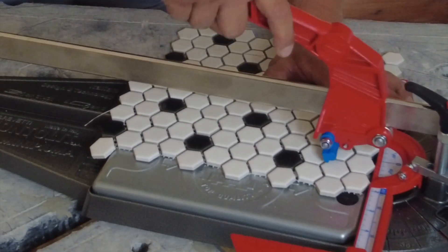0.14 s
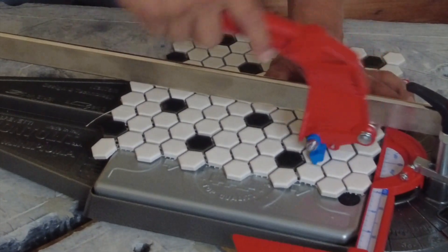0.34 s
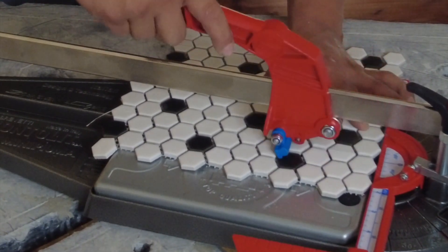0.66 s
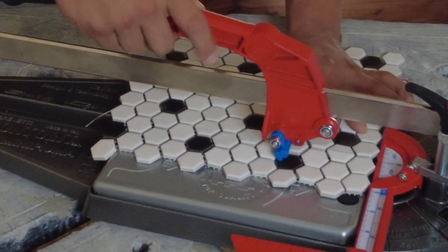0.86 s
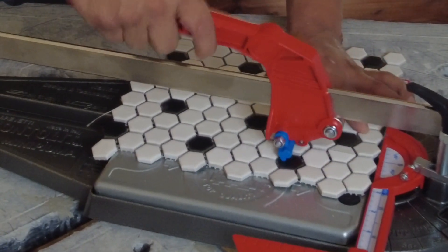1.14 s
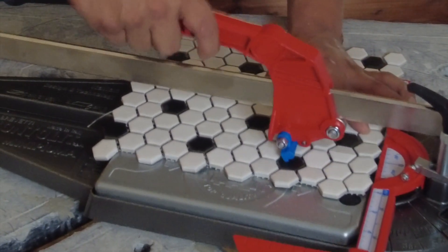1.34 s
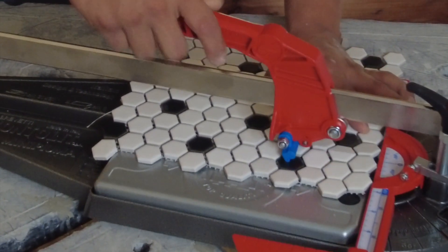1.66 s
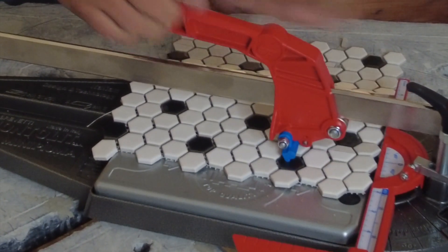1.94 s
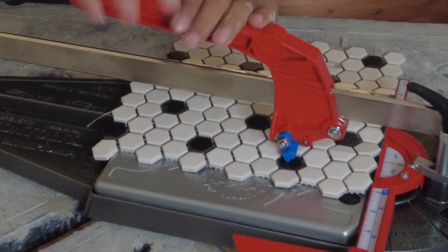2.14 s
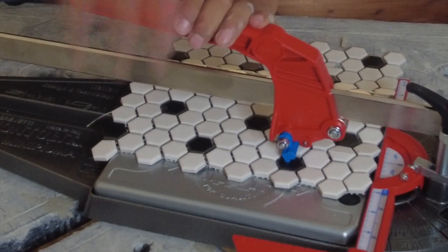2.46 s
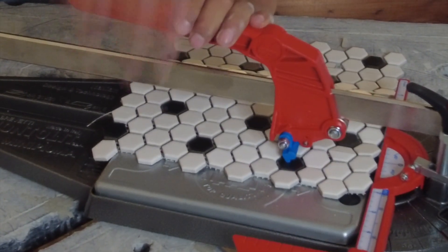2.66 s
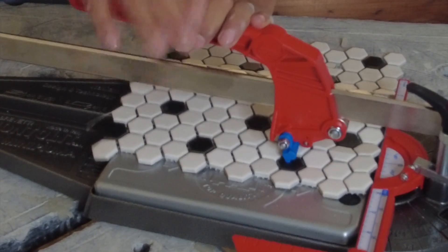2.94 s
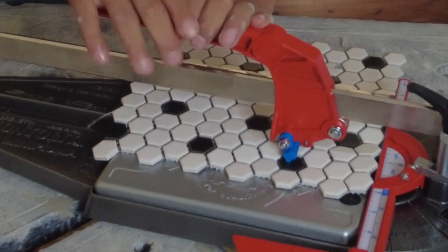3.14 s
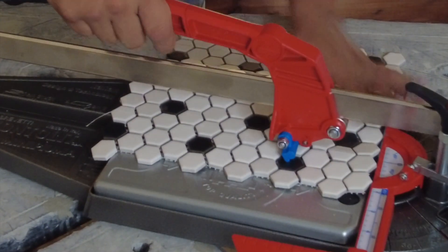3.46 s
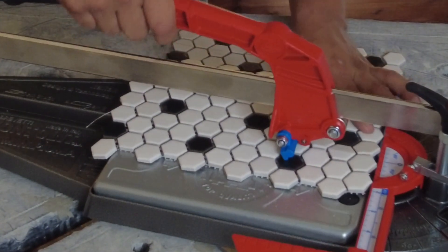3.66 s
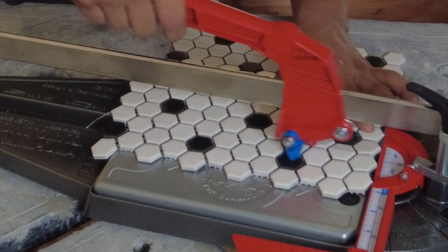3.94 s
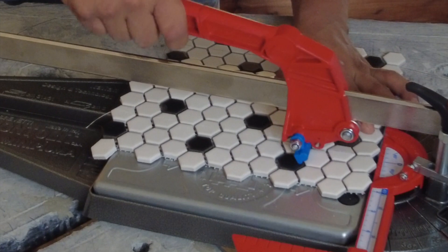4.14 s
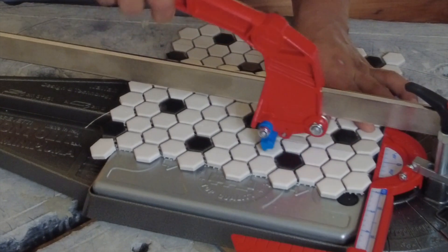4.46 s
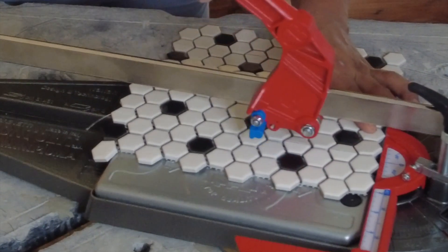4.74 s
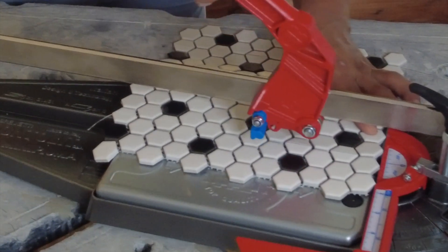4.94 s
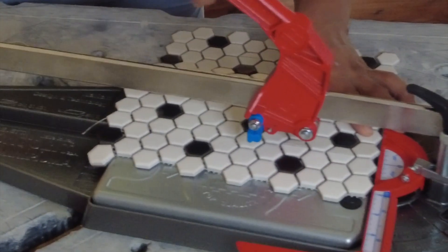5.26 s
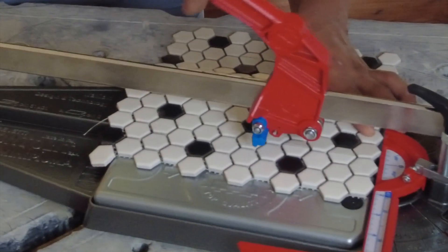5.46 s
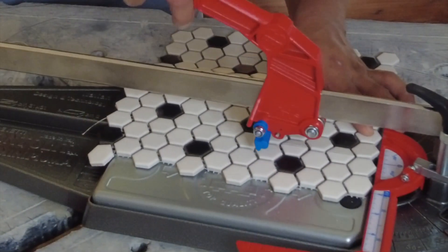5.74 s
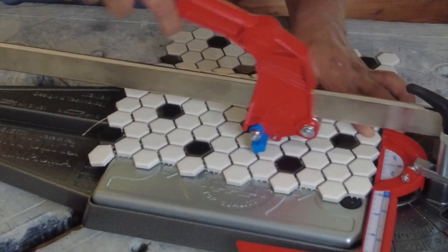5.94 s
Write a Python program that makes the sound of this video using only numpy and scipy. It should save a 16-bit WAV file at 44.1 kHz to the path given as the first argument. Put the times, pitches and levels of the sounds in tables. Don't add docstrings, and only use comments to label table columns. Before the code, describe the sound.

Close up in a small hard room, a hand tile cutter slides briefly and ticks, then bangs down in a dense flurry of cracks, rattles and hollow clacks on small ceramic tiles. After a lull come several firm palm blows with crunching grit and bench thumps. Light ticking follows, then a short ringing slide, a sharp knock and a final heavy double crack.

```python
import sys
import numpy as np
from scipy import signal
from scipy.fft import rfft, irfft
from scipy.io import wavfile

SR = 44100
rng = np.random.default_rng(int(sys.argv[2]) if len(sys.argv) > 2 else 0)


def boost(x):
    u = np.asarray(x, float) / 20
    return 10 ** u


def unload_audio(sound):
    columns = np.transpose(np.atleast_2d(sound))
    steps = np.round(np.clip(columns, -1, 1) * 32767)
    wavfile.write(sys.argv[1], SR, steps.astype(np.int16))


N = 269010
TIME_S = np.arange(N) / SR


def rms_one(x):
    return x / np.sqrt(np.mean(x ** 2) + 1e-20)


def at_hz(points, hz):
    table_hz, values = np.transpose(points)
    return np.interp(np.log(hz), np.log(table_hz), values)


def band(x, low_hz, high_hz, order=2):
    edges_hz = [low_hz, min(high_hz, 0.45 * SR)]
    return signal.sosfilt(signal.butter(order, edges_hz, "band", fs=SR, output="sos"), x)


def ring(clicks, hz, t60_s):
    r, w = boost(-60 / (t60_s * SR)), 2 * np.pi * hz / SR
    return signal.lfilter([0, np.sin(w)], [1, -2 * r * np.cos(w), r * r], clicks + 1e-18)


def grains(per_s, spread_db):
    sizes = boost(spread_db * np.minimum(rng.exponential(1, N), 4))
    signs = rng.choice([-1, 1], N)
    return rms_one(sizes * signs * (rng.random(N) < per_s / SR))


def body(force, modes, low_hz, high_hz, dull_db, touch=1):
    out = boost(dull_db) * band(force, low_hz, high_hz)
    touch = np.broadcast_to(touch, (len(modes), N))
    for k, (hz, db, t60_s) in enumerate(modes):
        sign = (-1) ** k
        out += sign * boost(db) * ring(force * touch[k], hz, t60_s) / np.sqrt(t60_s * SR)
    return out


def after(rows, column, t60_s, rise_s):
    rows = np.array(rows)
    t = np.maximum(TIME_S - rows[:, :1], 0)
    decay = boost(rows[:, column:column + 1] - 60 * t / t60_s)
    return np.sum(decay * (1 - np.exp(-t / rise_s)), axis=0)


# [t/s, base level/dB, tile level/dB, struck part f/Hz, rattle t60/s]
STRIKES = [(0.041, -23.5, -22.5, 1060, 0.028), (.5129, -26, -23.5, 766, 0.038),
           (0.77, -27, -25.5, 330, 0.031), (0.9911, -26.5, -20.5, 733, 0.043),
           (1.1114, -6, -1.5, 754, 0.031), (1.222, -35, -18.5, 705, 0.045), (1.2928, -20, -26, 322, 0.23),
           (1.3308, -10.5, -19, 850, 0.023), (1.426, -32, -17.5, 720, 0.054),
           (1.4658, -20, -21, 1100, 0.29), (1.5046, -0.5, -7, 860, 0.019),
           (2.0232, -29.5, -28, 1220, 0.023), (2.2878, -23, -23.5, 905, 0.14),
           (2.5205, -15, -18.5, 900, 0.15), (2.722, -11, -5, 1032, 0.027), (2.7358, -11, -35, 603, 0.026),
           (2.918, -10, -2, 1000, 0.016), (3.071, -8, -6.5, 675, 0.026), (4.3017, -20.5, -27, 1140, 0.012),
           (4.448, -28, -24, 1120, 0.019), (4.6615, -10, -1.5, 775, 0.057),
           (4.678, -19.5, -17, 1120, 0.0083), (5.2615, -0.5, -18, 570, 0.029),
           (5.2752, -7, -6.5, 880, 0.071)]
# [t/s, base level/dB, tile level/dB, rattle t60/s]
REBOUNDS = [(1.0156, -29, -25, 0.0079), (1.1448, -9, -11.5, 0.0044), (1.3116, -8.5, -22, 0.019),
            (1.5253, -9.5, -19, 0.051), (1.57, -19.5, -19, 0.016), (2.3218, -12.5, -22, 0.029),
            (2.3559, -23.5, -33, 0.049), (2.5524, -12.5, -26, 0.011), (2.5905, -15, -18.5, 0.016),
            (2.7514, -13.5, -19.5, 0.1), (2.7924, -15.5, -18, 0.012), (2.8184, -39.5, -21.5, 0.049),
            (2.93, -9.5, -18.5, 0.074), (2.9463, -13, -19, 0.062), (2.9905, -16, -17, 0.03),
            (3.019, -49, -20.5, 0.027), (3.082, -8.5, -15, 0.063), (3.1029, -16, -18.5, 0.15),
            (3.1439, -21, -17.5, 0.062), (3.3074, -40, -36.5, 0.18), (4.365, -26, -24, 0.17),
            (4.7697, -21.5, -27, 0.12), (4.9465, -23.5, -28, 0.0045), (4.9694, -27, -28.5, 0.043),
            (5.0325, -22.5, -53.5, 0.0087), (5.0469, -48, -21, 0.011), (5.0584, -28, -28.5, 0.12),
            (5.168, -28.5, -54, 0.036), (5.5096, -30, -30.5, 0.11), (6.0726, -28, -32, 0.047)]
# [t/s, base level/dB, tile level/dB, struck part f/Hz]
TICKS = [(.3865, -29, -28, 690), (0.44, -39, -39, 1170), (0.479, -40, -35, 705), (0.733, -41, -45, 730),
         (1.059, -30.5, -25, 684), (1.2772, -29, -29, 665), (1.6376, -40, -54, 703),
         (1.87, -57, -45.5, 306), (2.07, -42, -42, 308), (2.145, -47, -52, 799), (2.2664, -50, -44, 304),
         (2.467, -40, -69, 704), (3.2502, -34, -45, 610), (3.3908, -38, -43, 304),
         (3.5329, -44, -39.5, 960), (3.5795, -63, -39.5, 320), (3.6546, -47, -42, 700),
         (3.7492, -40, -50.5, 730), (3.856, -67, -56.5, 372), (3.895, -61.5, -64, 700),
         (4.1453, -42.5, -57, 730), (4.1825, -59, -48, 816), (4.233, -33.5, -28, 960),
         (4.582, -74, -48, 720), (4.833, -32.5, -35.5, 775), (4.912, -42, -61, 710), (5.137, -31, -35, 921),
         (5.4084, -26.5, -29.5, 750), (5.466, -32, -47, 810), (5.7548, -39, -43, 346)]


def contacts():
    strikes = [(s, base, tile, tile - 15, hz, t60_s) for s, base, tile, hz, t60_s in STRIKES]
    rebounds = [(s, base, tile, tile - 29, 830, t60_s) for s, base, tile, t60_s in REBOUNDS]
    ticks = [(s, base, tile, tile - 22, hz, 0.054) for s, base, tile, hz in TICKS]
    return sorted(strikes + rebounds + ticks)


# [f/Hz, level/dB, t60/s]
BASE = [(340, -8, 0.11), (524, -20, 0.075), (577, -11, 0.023), (673.5, -2, 0.019), (730, -3, 0.026),
        (790, -2.5, 0.016), (860, -2.5, 0.02), (900, 0, 0.022), (948, -7.5, 0.01), (1120, -7.5, 0.032),
        (1338, -14.5, 0.036)]
# [f/Hz, level/dB, t60/s]
TILES = [(1430, -13, 0.049), (1860, -3, 0.0038), (1983, -4, 0.034), (2120, -14.5, 0.039),
         (2316, -4.5, 0.015), (2500, -4, 0.0067), (3040, -14, 0.034), (3090, -13.5, 0.014),
         (3624, -16, 0.066), (3766, -14, 0.029)]
# [f/Hz, level/dB, t60/s]
GRIT = [(4090, -14.5, 0.052), (4880, -35.5, 0.0078), (5560, -11, .015)]


def knocks():
    rows = contacts()
    at = np.array([round(row[0] * SR) for row in rows])
    force = np.zeros((3, N))
    for i, (_, base_db, tile_db, grit_db, _, t60_s) in zip(at, rows):
        t60_s = np.clip(t60_s, 0.005, 0.4)
        t = np.arange(min(N - i, int(SR * t60_s * 8))) / SR
        decay = boost(-60 * t / t60_s) + boost(-9.5 - 20 * t / t60_s)
        force[:, i:i + len(t)] += boost([[base_db], [tile_db], [grit_db]]) * decay
    rattle = grains(9000, 2.5)
    rattle[at] = 6.45
    force *= rattle

    latest = np.maximum(np.searchsorted(at, np.arange(N), side="right") - 1, 0)
    chance = np.clip(rng.standard_normal((len(at), 30)).T, -1.5, 1.5)
    base_chance, tile_chance = chance[:len(BASE)], chance[11:11 + len(TILES)]
    octaves = np.log2(np.array(BASE)[:, :1] / np.array(rows)[:, 4])
    base_touch = boost(-6 * octaves ** 2 + 2.38 * base_chance)[:, latest]
    tile_touch = boost(2 * tile_chance)[:, latest]

    base = body(force[0], BASE, 450, 1042, -4, base_touch)
    tiles = body(force[1], TILES, 560, 6680, -11, tile_touch)
    grit = body(force[2], GRIT, 3560, 7380, 0.89)
    return boost(12) * band(base, 150, 2100) + boost(2) * band(tiles, 450, 5700) + boost(4) * grit


# [f/Hz, level/dB, t60/s]
CLACK = [(690, -5, 0.013), (774.4, 1, 0.024), (857.6, -8.5, 0.056)]


def clacks():
    rows = [row[:3] for row in REBOUNDS + TICKS]
    rows += [(s, base_db - 7, -90) for s, base_db, *_ in STRIKES]
    s, clack_db, chink_db = np.transpose(rows)
    at = np.round(s * SR).astype(int)
    chance_db = rng.normal(0, 0.79, (len(rows), len(CLACK) + 1)).T
    contact_t60_s = 0.009
    clack = np.zeros(N)
    for (hz, db, t60_s), spot_db in zip(CLACK, chance_db):
        clicks = np.zeros(N)
        clicks[at] = boost(clack_db + 4.5 + db + spot_db)
        touch = ring(clicks, hz, contact_t60_s) * 15 / (contact_t60_s * SR)
        clack += ring(touch, hz, t60_s)
    clicks = np.zeros(N)
    clicks[at] = boost(chink_db + chance_db[-1])
    chink = ring(clicks, 2630, 0.0065)
    return band(clack, 150, 1700, order=1) + band(chink, 1500, 4500)


# [t/s, level/dB,
# t60/s, f/Hz]
RINGS = [(.383, -37, 0.11, 330), (.773, -32.5, 0.076, 324), (0.994, -29.5, 0.068, 326),
         (1.017, -29, 0.051, 1205), (1.113, -7, 0.05, 340), (1.115, -17.5, 0.13, 1443),
         (1.296, -24.5, 0.057, 333), (1.494, -13, 0.062, 345), (1.506, -18, 0.071, 876),
         (1.527, -8, 0.087, 887), (1.545, -26, 0.071, 4280), (1.53, -25.5, 0.22, 1843),
         (2.93, -40, .25, 2120), (3.09, -37, 0.47, 4060), (3.312, -40, 0.26, 1530),
         (3.999, -35, 0.19, 1128), (4.01, -48, 0.34, 2020), (4.31, -44, 0.66, 2000),
         (4.663, -11.5, 0.052, 334), (4.664, -12.5, 0.18, 713), (4.664, -18, 0.24, 1120),
         (4.664, -14, 0.1, 1950), (4.665, -34, 0.11, 3210), (5.262, -8, 0.086, 300),
         (5.275, -5, 0.066, 702), (3.087, -17, .03, 2950), (6.038, -42, .6, 1118),
         (4.766, -27.5, 0.17, 351), (5.515, -41.5, 0.25, 1970), (0.999, -37, 0.19, 1940),
         (2.03, -39, 0.087, 1655), (4.446, -36, 0.14, 1122), (3.335, -35, 0.14, 1920),
         (.043, -25.5, 0.17, 725), (0.773, -37.5, 0.089, 3150), (5.301, -37, 0.24, 3840),
         (2.307, -11.5, .035, 793), (2.330, -21, 0.089, 790), (2.533, -17.5, .03, 840),
         (2.555, -13.5, 0.044, 774), (0.555, -26, .05, 900), (4.012, -34, 0.055, 2140),
         (4.047, -33, .06, 2160), (4.372, -23, 0.077, 2150), (4.402, -28, .07, 1900),
         (6.073, -28, 0.13, 1510), (1.597, -23, 0.034, 826), (5.338, -21, 0.042, 807)]


def rings():
    out, t = np.zeros(N + SR), np.arange(SR // 2) / SR
    twin_ratio, twin_db = 1.018, -7
    wavers = 1 + 0.35 * rms_one(band(rng.standard_normal((len(RINGS), len(t))), 20, 120))
    for (s, db, t60_s, hz), waver in zip(RINGS, wavers):
        i = round(s * SR)
        envelope = boost(db - 60 * t / t60_s) * (1 - np.exp(-t / 0.0017))
        twin = boost(twin_db) * np.sin(2 * np.pi * hz * twin_ratio * t)
        out[i:i + len(t)] += waver * envelope * (np.sin(2 * np.pi * hz * t) + twin)
    return out[:N]


# [t/s, level/dB, t60/s, f/Hz]
PINGS = [(.045, -49.5, .7, 1500), (3.325, -39, .3, 1860), (5.290, -37, .32, 6433), (5.275, -37, .33, 8190),
         (5.510, -29, .04, 2600), (2.025, -38, .12, 1165), (2.05, -49, .4, 320), (1.62, -44, .5, 680),
         (.042, -26, .12, 1030), (3.53, -60, .8, 2150), (4.304, -27, .5, 1122), (.55, -37, .4, 1500),
         (4.39, -32, .3, 1122), (.553, -31, .2, 2170)]


def pings():
    out = np.zeros(N)
    for s, db, t60_s, hz in PINGS:
        t = np.maximum(TIME_S - s, 0)
        waver = 1 + 0.4 * rms_one(band(rng.standard_normal(N), 15, 90))
        envelope = boost(db - 60 * t / t60_s) * (1 - np.exp(-t / 0.00034))
        out += waver * envelope * np.sin(2 * np.pi * hz * t)
    return out


# [t/s, level/dB]
JOLTS = [
    (2.7221, -15.5),
    (2.9185, -13.5),
    (3.0716, -16),
]
# [f/Hz, level/dB, t60/s]
WHEEL = [(2400, -2.5, 0.028), (3150, -6, 0.045), (4970, 0, .02), (6900, -7, 0.016)]


def wheel():
    clicks = np.zeros(N)
    for s, db in JOLTS:
        clicks[round(s * SR)] = boost(db)
    return sum(boost(db) * ring(clicks, hz, t60_s) for hz, db, t60_s in WHEEL)


# [t/s, level/dB, centre f/Hz, t60/s]
SPARKS = [(0.3825, -33, 4800, 0.031), (.5122, -47, 7000, .05), (.582, -26, 3800, .04),
          (0.7723, -48, 8100, 0.028), (0.941, -48, 8900, .02), (0.9915, -25.5, 9100, 0.039),
          (1.077, -37, 4930, 0.33), (1.144, -8.5, 2630, 0.022), (1.223, -28.5, 9000, 0.051),
          (1.269, -39, 8000, .05), (1.283, -29, 6100, .08), (1.300, -28, 8400, 0.11),
          (1.3271, -6.5, 2360, 0.021), (1.4243, -35, 7000, 0.062), (1.4984, -24.5, 7650, 0.055),
          (1.5267, -19, 2620, .03), (1.547, -25, 6300, 0.099), (1.8716, -45.5, 8800, 0.016),
          (2.0218, -44, 8000, .04), (2.301, -28, 7760, 0.048), (2.5317, -28.5, 7700, 0.055),
          (3.017, -47, 12000, .03), (3.146, -37, 10800, 0.073), (3.319, -32, 2700, 0.092),
          (3.4186, -45, 8800, .03), (3.49, -49, 8950, 0.022), (3.5404, -44, 5900, 0.025),
          (3.5824, -45, 7100, 0.023), (3.717, -50, 11900, .02), (3.8227, -50, 11150, 0.019),
          (3.8417, -49, 7920, 0.021), (3.857, -48, 2310, 0.036), (3.9005, -51.5, 8000, .02),
          (3.932, -51.5, 12000, .02), (4.188, -43, 7800, 0.025), (4.25, -44, 11400, 0.024),
          (4.268, -44, 10000, .02), (4.37, -28.5, 6700, .04), (4.445, -46, 5170, 0.036),
          (4.9468, -22, 2400, 0.024), (4.9683, -36.5, 7500, 0.039), (5.044, -39, 2600, .04),
          (5.0586, -30, 6900, 0.032), (5.167, -31.5, 2560, 0.034), (5.2764, -29, 7200, 0.15),
          (1.785, -48, 5800, .03), (1.984, -51, 5500, 0.023), (2.168, -49, 5800, .03),
          (4.408, -38, 8600, .06), (4.405, -32, 5410, 0.073)]


def sparks():
    out, t = np.zeros(N + SR), np.arange(SR // 8) / SR
    spread = 2 ** 0.29
    for s, db, hz, t60_s in SPARKS:
        i = round(s * SR)
        puff = rms_one(band(rng.standard_normal(len(t)), hz / spread, hz * spread))
        out[i:i + len(t)] += boost(db - 9 - 60 * t / t60_s) * puff
    return out[:N]


# [t/s, level/dB, t60/s]
GRINDS = [(0.971, -49, 0.34), (1.27, -36.5, 0.76), (1.53, -28, 0.25), (2.295, -38, 0.32),
          (2.529, -29.5, 0.37), (2.73, -30, 0.47), (2.93, -27.5, 0.54), (3.085, -24.5, 0.4), (3.31, -59, 1),
          (3.95, -49, 0.31), (4.37, -50, 0.23), (5.28, -28.5, 0.29)]
# [f/Hz, level/dB, t60/s]
GLAZE = [(1590, 1, 0.0099), (2103, -3, 0.013), (2450, -2, 0.014), (3100, -6.5, 0.0086), (4060, -4.5, .012),
         (4160, -7.5, 0.012), (5130, -7, .006), (6500, -9.5, .006), (7470, -14, .006), (8170, -17, .006),
         (8600, -15.5, .006), (11200, -21.5, 0.0045)]


def grind():
    push = sum(after([(s, db)], 1, t60_s, 0.006) for s, db, t60_s in GRINDS)
    return push * rms_one(body(grains(5000, 2.7), GLAZE, 1400, 10000, -23))


# [t/s at full speed, run-up/s, hold/s, slip level/dB, grit level/dB]
SLIDES = [
    (0.314, 0.056, 0.04, -32, -38),
    (0.514, 0.082, 0.073, -26.5, -26.5),
    (4.004, 0.086, 0.029, -29.5, -55),
    (4.298, 0.0032, 0.14, -32, -39.5),
    (6.085, 0.15, 0.055, -31.5, -40),
]
# [f/Hz, width/Hz, level/dB]
RAIL_NEAR = [(790, 240, -2.5), (1140, 35, -2), (1510, 29, -11.5), (1995, 42, -8.5), (2160, 19, -18),
             (2840, 30, -24), (2850, 49, -27), (3040, 290, -14), (3400, 100, -16), (3800, 60, -20),
             (938, 21, -9)]
RAIL_MID = [(705, 24, 1.5), (884, 25, -3), (1128, 40, -4), (2060, 310, -6), (2220, 100, -15),
            (2490, 35, -21), (3060, 53, -33), (1916, 36, -18), (3430, 66, -28), (4750, 150, -27),
            (7500, 790, -28.5)]
RAIL_FAR = [(330, 40, -5.5), (684, 13, -5), (888, 11, 1.5), (1122, 13, 6.5), (1484, 41, -5.5),
            (2000, 93, 0), (2207, 63, -7.5), (2556, 72, -21.5), (3110, 37, -15), (3270, 40, -14),
            (3530, 45, -16.5), (4840, 54, -28.5), (5410, 70, -20.5), (6320, 34, -24.5)]
RAIL_END = [(479, 43, -4), (700, 38, -6), (920, 36, -4), (1120, 19, 2), (1340, 24, -10.5), (1520, 90, -7),
            (2120, 60, -9), (2800, 60, -19), (3760, 60, -22)]


def slide():
    slips, scratches, out = grains(2500, 4.8), grains(5100, 2.3), np.zeros(N)
    rails = [RAIL_NEAR, RAIL_NEAR, RAIL_MID, RAIL_FAR, RAIL_END]
    run_up_db, slip_stop_db_per_s, grit_stop_db_per_s = 32, 423, 458
    for (s, run_up_s, hold_s, slip_db, grit_db), peaks in zip(SLIDES, rails):
        t = TIME_S - s
        rise_db = run_up_db * np.minimum(t / max(run_up_s, 0.002), 0)
        past_s = np.maximum(t - hold_s, 0)
        slip = slips * boost(slip_db + rise_db - slip_stop_db_per_s * past_s)
        scratch = scratches * boost(grit_db + rise_db - grit_stop_db_per_s * past_s)
        modes = [(hz, db, 1.93 / width_hz) for hz, width_hz, db in peaks]
        out += boost(11) * body(slip, modes, 220, 2100, -13)
        out += boost(-13.5) * band(scratch, 2800, 8300)
    return out


# [t/s, level/dB]
HANDLING = [(0.0, -42.5), (0.34, -65.5), (0.47, -52.5), (1.0, -58), (1.21, -26.5), (1.48, -38.5),
            (1.72, -55), (2.12, -54), (2.99, -35.5), (3.75, -56), (3.8, -74), (3.93, -58.5), (4.31, -54),
            (4.72, -54.5), (4.88, -42.5), (5.37, -29), (5.609, -55.5), (6.1, -57)]


def hands_db():
    s, db = np.transpose(HANDLING)
    return np.interp(TIME_S, s, db, left=-120, right=-120)


def hands_swing_db():
    return hands_db() - np.mean(np.array(HANDLING)[:, 1])


def rustle():
    level = boost(hands_db() - 13) + boost(-13) * after(STRIKES, 1, 0.18, 0.002)
    return level * rms_one(body(grains(3000, 4.8), BASE, 160, 2640, -9.5))


def hiss():
    level = boost(-68.5 + 0.26 * hands_swing_db()) + boost(-58.5) * after(STRIKES, 2, 0.14, 0.01)
    return level * rms_one(band(grains(9000, 1.8), 2500, 6600, order=1))


# [t/s of first swing, low sway level/dB, upper sway level/dB]
BLOWS = [
    (0.812, -24, -37),
    (1.146, -28.5, -26.5),
    (1.327, -24, -31.5),
    (1.522, -12.5, -10.5),
    (2.318, -21, -26),
    (2.552, -15, -15.5),
    (2.755, -15, -12.5),
    (2.949, -14, -10),
    (3.105, -17, -12.5),
    (5.288, -35.5, -22.5),
]
# [f/Hz, t60/s]
BENCH = [(34, 0.36), (58, 0.19), (88, 0.18)]
# [t/s, level/dB, t60/s]
THUDS = [(0.033, -46, 0.24), (0.293, -39, 0.13), (0.498, -42.5, 0.15), (0.775, -46, 1),
         (0.983, -30.5, 0.033), (1.113, -29, 0.037), (1.144, -22, 0.28), (1.297, -17, 0.35),
         (1.495, -13.5, 0.2), (2.018, -41, 0.069), (2.291, -30.5, 0.98), (2.519, -31.5, 0.63),
         (2.724, -19.5, 0.18), (2.92, -60, 0.11), (3.076, -12, 0.2), (3.199, -43, 0.34),
         (3.334, -18.5, 0.075), (3.955, -39, 0.082), (4.292, -34, 0.1), (4.665, -10, 0.051),
         (4.757, -21.5, 0.27), (5.031, -29.5, 0.39), (5.132, -34.5, 0.5), (5.26, -5.5, 0.14),
         (5.504, -32.5, 0.29), (5.997, -42, 0.42)]


def bench():
    sway, thud_force = np.zeros(N), np.zeros(N)
    for s, low_db, upper_db in BLOWS:
        t = TIME_S - s
        push = np.clip((t + 0.016) / 0.008, 0, 1)
        for (hz, t60_s), db in zip(BENCH, [low_db, upper_db, upper_db - 11]):
            sway += push * boost(db - 60 * np.maximum(t, 0) / t60_s) * np.cos(2 * np.pi * hz * t)
    for s, db, t60_s in THUDS:
        t = TIME_S - s
        thud_force += np.clip(t / 0.0058, 0, 1) * boost(db - 60 * np.abs(t) / t60_s)
    return sway + boost(-4.5) * thud_force * rms_one(band(rng.standard_normal(N), 48, 215))


def tremble():
    noise = rng.standard_normal(N)
    modes = ring(noise, 31.84, 0.65) + boost(-3) * ring(noise, 62.7, 0.3)
    level = boost(-48 + 0.73 * hands_swing_db())
    level += boost(-7) * after(BLOWS, 1, 0.77, 0.0062)
    level += boost(-22) * after(THUDS, 1, 0.8, 0.036)
    return level * rms_one(band(modes, 22, 62))


# [f/Hz, t60/s]
ROOM = [(200, 0.25), (800, 0.27), (3000, 0.3), (8000, 0.25), (14000, 0.24)]


def room(x):
    t, edges_hz = np.arange(SR // 2) / SR, 120 * 2 ** np.arange(0, 7.6, 0.5)
    white, tail = rng.standard_normal(len(t)), np.zeros(len(t))
    for low_hz, high_hz in zip(edges_hz, edges_hz[1:]):
        tail += band(white, low_hz, high_hz) * boost(-60 * t / at_hz(ROOM, low_hz))
    tail *= 1 - np.exp(-t / 0.0074)
    return signal.fftconvolve(x, tail / np.sqrt(np.sum(tail ** 2)))[:N]


# [f/Hz, level/dB per Hz]
FLOOR = [(15, -37.5), (25, 10), (43, -18), (97, -20.5), (249, -23.5), (340, -18), (400, -31), (700, -25.5),
         (1600, -37), (2300, -33), (3500, -49.5), (8000, -51), (15900, -76)]


def air():
    hz = np.maximum(np.arange(N // 2 + 1) * SR / N, 1)
    noise = rms_one(irfft(rfft(rng.standard_normal(N)) * boost(at_hz(FLOOR, hz)), N))
    return noise * boost(-49.5 + 0.62 * (np.clip(hands_db(), -75, -50) + 60))


def scene():
    loose = rustle() + hiss()
    rumble = tremble()
    cutter = knocks() + pings() + slide() + loose
    cutter += clacks() + rings() + sparks() + grind() + wheel()
    background = air()
    mix = cutter + boost(-7.5) * room(cutter) + bench() + rumble + background
    return mix[None]


def low_pass(x):
    return signal.sosfilt(signal.butter(12, 16090, fs=SR, output="sos"), x)


def record(dry):
    bent = dry / (1 + np.abs(dry) ** 6) ** (1 / 6)
    cut = signal.sosfilt(signal.cheby2(10, 50, 16300, fs=SR, output="sos"), bent)
    return low_pass(cut)


dry = scene()
out = record(dry)
unload_audio(out)
```